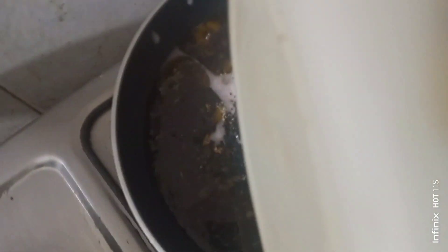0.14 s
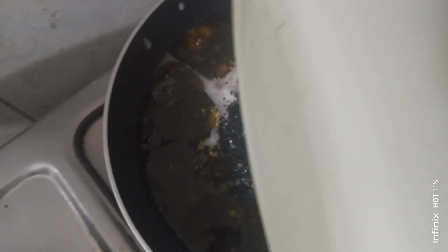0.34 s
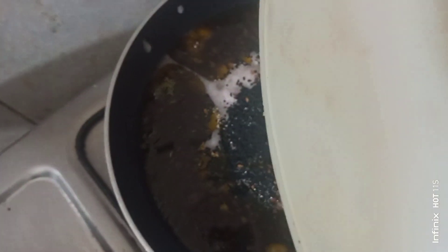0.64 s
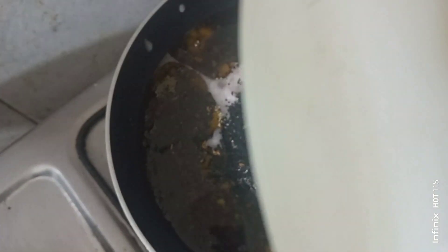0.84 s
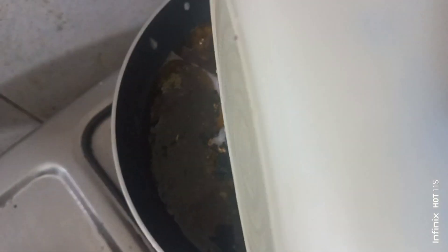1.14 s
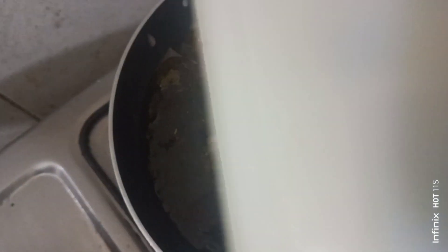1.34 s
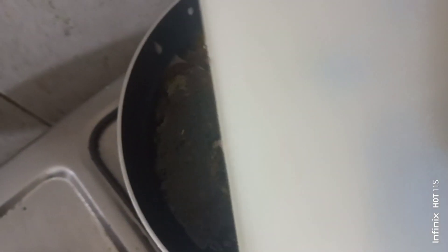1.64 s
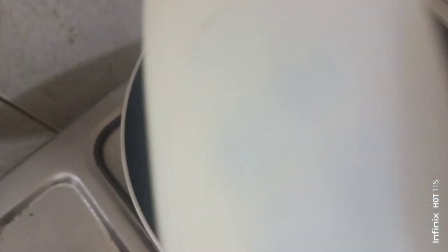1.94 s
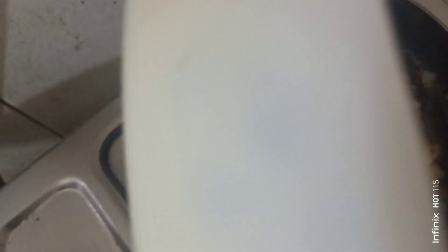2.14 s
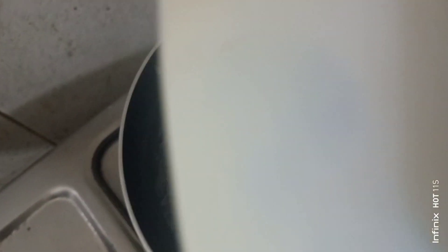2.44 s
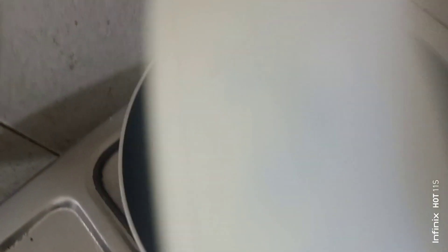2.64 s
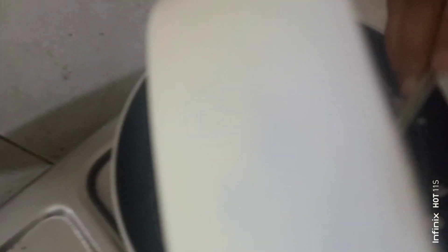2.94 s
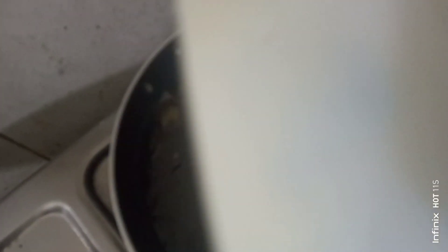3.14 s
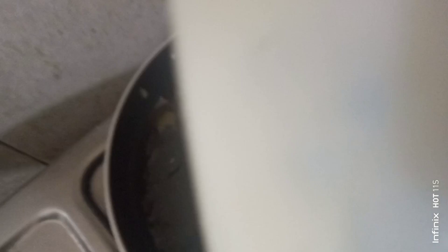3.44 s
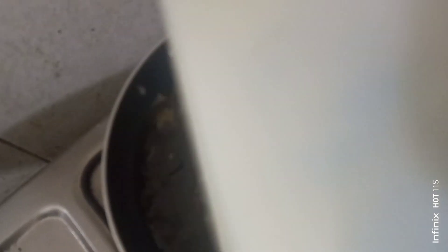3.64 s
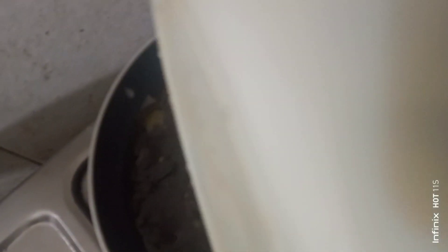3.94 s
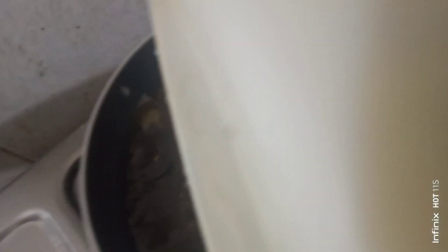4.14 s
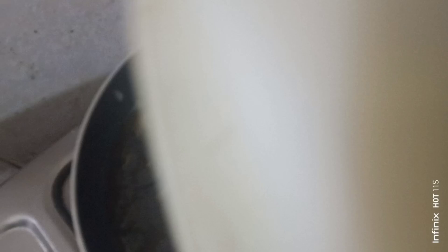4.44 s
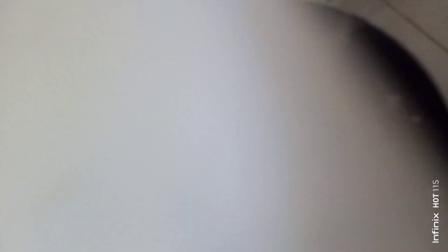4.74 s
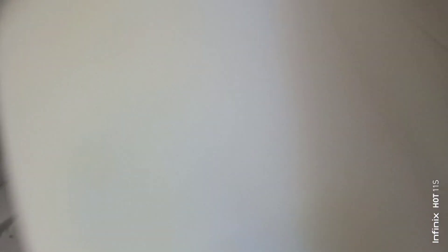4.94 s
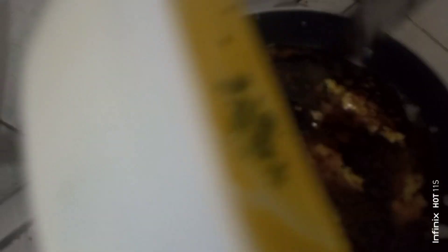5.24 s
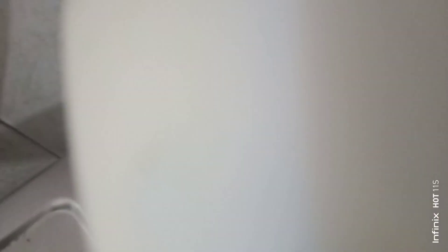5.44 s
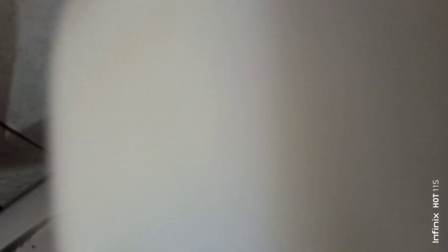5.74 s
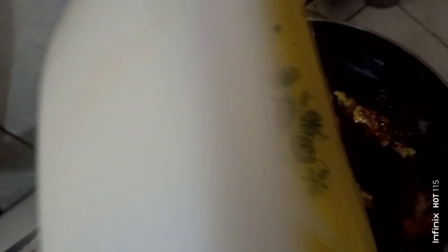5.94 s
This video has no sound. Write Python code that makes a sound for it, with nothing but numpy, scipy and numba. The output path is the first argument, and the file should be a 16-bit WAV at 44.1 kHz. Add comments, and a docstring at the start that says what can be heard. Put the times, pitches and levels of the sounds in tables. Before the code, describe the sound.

A metal spoon clinks and scrapes irregularly in a frying pan of moist food, close up in a small hard-walled kitchen over faint hum.

```python
"""In a small hard-walled kitchen, a metal spoon stirs a moist mixture in a frying pan, close by.
Its clinks and its stick-slip drags excite the same four families of decaying modes, with short noise bursts.
Soft rubs are noise-modulated gliding tones; a thin whistle, frequency-modulated, comes and goes.
Low wavering tones with rumble hum over room noise. A gain control ducks loud sounds and the hum with them."""
import sys
import numpy as np
from scipy import signal
from scipy.fft import rfft, irfft, next_fast_len
from scipy.io import wavfile
from scipy.ndimage import uniform_filter1d, map_coordinates
from numba import njit

SR = 44100
rng = np.random.default_rng(int(sys.argv[2]) if len(sys.argv) > 2 else 0)


def output_pcm(signal):
    """Save a mono or channel-first signal as 16-bit PCM at the path in sys.argv[1].

    Samples are clipped to [-1, 1] before scaling.
    """
    pcm = np.clip(np.atleast_2d(signal).T, -1, 1) * 32767
    wavfile.write(sys.argv[1], SR, np.round(pcm).astype(np.int16))


N = 268524  # samples

FIRM_DB = -3  # strength of a firm blow
SHARPEN = 0.075  # extra dB of crack and tick per dB of strength above a firm blow
CUSHION = 0.1  # dB by which the swell time grows per dB of strength below a firm blow
SWELL_S = 0.0016  # time constant in which the ring of a firm blow swells
CRACK_DB = 1.5  # crack of a blow beside its sharpened strength
TICK_TILT = 0.28  # dB of tick per dB of brightness

# Spoon meets pan: (time [s], strength [dB], brightness [dB], pan body [dB re strength],
# leading mode [Hz], its level [dB re strength], damping t60 [s])
BLOWS = [(0.0094, -27.5, -7.5, -22.5, 2490, 1, 0.034), (0.069, -40, -13, -34, 2407, 10.5, 0.037),
         (0.35, -31.5, -10.5, 4, 2100, 5, 0.15), (0.5041, -18.5, 23, -16, 4490, -6, 0.049),
         (0.6118, -32, 14, -11.5, 2920, -1, 0.09), (0.6255, -25.5, 9.5, -15.5, 3690, 5, 0.054),
         (0.7504, -30.5, 10.5, -22, 2870, -2, 0.064), (0.7645, -25, 4, -9.5, 2484, 5, 0.049),
         (0.7992, -26.5, -6, -19.5, 2412, 10, 0.064), (0.878, -23, -14.5, -14.5, 3936, 1.5, 0.097),
         (1.177, -19.5, 10, -35.5, 2360, 0, 0.078), (1.4068, -10, -1.5, -22.5, 4007, 1, 0.072),
         (1.52, -19.5, -15, -18.5, 2467, 3, 0.041), (1.5516, -16, -4.5, -25.5, 4367, -8, 0.11),
         (1.6133, -26.5, -16.5, -35, 3890, 2, 0.053), (1.9589, -50, 6, 0.5, 3933, 0, 0.18),
         (2.0083, -39.5, 13, -22, 4344, 2.5, 0.079), (2.0626, -31.5, 4.5, -15, 3830, 7, 0.05),
         (2.1119, -30.5, -9, -17.5, 4070, 9, 0.033), (2.1787, -38, 13, -27, 3985, 5, 0.092),
         (2.227, -25, 19.5, -35.5, 3680, 8.5, 0.02), (2.242, -23, 6.5, -19.5, 4040, -2.5, 0.039),
         (2.2633, -29, 6, -16, 2365, -2, 0.1), (2.525, -19, -9, -7.5, 3990, -2.5, 0.07),
         (2.651, -9.5, 1.5, -20.5, 5040, -9, 0.024), (2.7209, -10.5, 7, -22, 3964, -0.5, 0.064),
         (2.7932, -19, -4, -20.5, 2462, 7.5, 0.064), (2.8492, -29, -8.5, -24, 2347, -3, 0.05),
         (2.868, -23.5, -18, -19, 3983, 7, 0.21), (3.2655, -15, 11, -32.5, 4409, 8.5, 0.04),
         (3.4097, -31, 10.5, -44, 6240, 10.5, 0.095), (3.4922, -26.5, -7, -35.5, 3964, 4, 0.114),
         (3.5053, -34, -17.5, -14, 2400, -1, 0.1), (3.741, -22, -1.5, -16, 3980, 12, 0.063),
         (3.791, -14.5, 0, -22, 6375, 7, 0.037), (3.985, -32, -7.5, -21, 2410, 1.5, 0.055),
         (4.0352, -27.5, 20.5, -19, 6400, -12, 0.03), (4.0915, -37, 11, -3.5, 3880, 11, 0.083),
         (4.3074, -15.5, 9.5, -16.5, 4324, -7, 0.076), (4.425, -19.5, 7, -21.5, 2860, -2, 0.057),
         (5.4609, -11, 2, -16, 4301, 6, 0.072), (5.5271, -27, -10, -9, 2970, -17, 0.12),
         (5.5599, -14.5, 0, -9.5, 3958, 8.5, 0.036), (5.5856, -16, -3.5, -14, 4022, 7, 0.083),
         (5.6132, -20, 1.5, -12.5, 2973, -9, 0.036), (5.6869, -23.5, 11, -13.5, 6590, 8.5, 0.057),
         (5.7185, -10, 12.5, -19.5, 6213, 5, 0.089), (6.0501, -15, 7.5, -11.5, 4300, 6, 0.079)]


def clinks(ring_db=9.5, tick_db=-27, wet_db=-7):
    """Impact excitation: each blow starts with a tiny bright tick and rings the modes; harder is sharper."""
    out = np.zeros(N)
    t = np.arange(SR // 100) / SR
    for s, db, bright_db, body_db, lead_hz, lead_db, damped_t60 in BLOWS:
        edge_db = db + SHARPEN * (db - FIRM_DB)
        swell_s = SWELL_S * amp(CUSHION * (FIRM_DB - db))
        lead = amp(db + ring_db + lead_db) * leading_mode(lead_hz, damped_t60, swell_s)
        add(out, s, in_kitchen(lead, wet_db=-15))

        family_db = families(db + ring_db, bright_db, body_db)
        blow = contact(s, family_db, edge_db + CRACK_DB, bright_db, damped_t60,
                       crack_t60=0.038, swell_s=swell_s, size=SR // 3)
        add(out, s, in_kitchen(blow, wet_db))

        tick_gain = amp(edge_db + tick_db + TICK_TILT * bright_db - 60 * t / 0.0082)
        add(out, s, tick_gain * rng.standard_normal(len(t)))
    return out


FREE_DB = -49  # the part of a leading mode that rings on
FREE_T60 = 0.62  # its decay time at 2.4 kHz [s], shorter for higher modes


def leading_mode(hz, damped_t60, swell_s):
    """Contact damping: the favoured mode wavers and is mostly damped by the spoon; a small part sings on."""
    t = np.arange(SR // 2) / SR
    free_t60 = FREE_T60 * np.sqrt(2400 / hz)
    # the random phase walk weakens with the spoon's damping
    steps = rng.standard_normal(len(t)) * np.exp(-t / damped_t60)
    waver = np.cumsum(steps) * .0004 * np.sqrt(hz)
    decay = amp(-60 * t / damped_t60) + amp(FREE_DB - 60 * t / free_t60)
    swell = 1 - np.exp(-t / swell_s)
    return swell * decay * np.sin(2 * np.pi * hz * t + waver)


DRAG_BODY_DB = -27  # pan body of a drag beside its strength

# Spoon drags over the pan: (time [s], length [s], strength [dB], brightness [dB], grit [dB re strength])
DRAGS = [(0.402, 0.071, -35.5, -8, -26), (0.51, 0.088, -32, 25.5, 4), (0.611, 0.18, -41.5, 22, 3),
         (0.82, 0.054, -29, -30, -16), (0.856, 0.077, -19, -13, -20.5), (1.194, 0.066, -28.5, -0.5, -12),
         (1.375, 0.028, -48, 14.5, -6), (1.456, 0.09, -25, 1.5, -3), (1.551, 0.067, -23, -3, -22),
         (2.039, 0.05, -35, 6, 2.5), (2.262, 0.055, -34.5, -4, -10.5), (2.646, 0.032, -31.5, 1.5, -3),
         (2.815, 0.044, -18, -22, -15.5), (2.863, 0.024, -14, -8, -29.5), (2.929, 0.06, -17, -3, -20.5),
         (3.001, 0.024, -33.5, 5, -20), (3.313, .06, -27, 2, -17), (3.395, 0.075, -19.5, -3.5, -21),
         (3.828, 0.069, -27, 1, -2), (3.97, 0.057, -28.5, 0.5, -12.5), (4.07, 0.043, -29, -0.5, -4),
         (4.333, 0.081, -28.5, -10, -18.5), (4.433, 0.042, -7.5, 5.5, -12.5),
         (5.656, 0.035, -19.5, -1, -9.5)]


def scrapes(scratch_db=-4, wet_db=-6):
    """Stick-slip friction: every slip is a tiny blow; each spot crossed has its own colour and caught grains."""
    out = np.zeros(N)
    step, slips_per_step = SR // 80, 7  # samples on one spot, slips on it
    slip_spread_db, bite_spread_db, colour_spread_db = 3.5, 1.5, 5
    for start, length, db, bright_db, grit_db in DRAGS:
        n = max(round(length * SR), step)
        stroke = np.zeros(n + SR // 4)
        pressure = np.pad(signal.windows.tukey(n, .3), (0, step))
        for first in range(0, n, step):
            size, push = rng.standard_normal((2, slips_per_step))
            places = first + rng.integers(0, step, slips_per_step)
            slips = np.sign(push) * amp(slip_spread_db * size)
            bite = amp(bite_spread_db * rng.standard_normal())
            forces = bite * slips / np.linalg.norm(slips) * pressure[places]

            colour_db = bright_db + colour_spread_db * rng.standard_normal()
            family_db = families(db, colour_db, DRAG_BODY_DB)
            answer = contact(start + first / SR, family_db, db + grit_db, colour_db,
                             damped_t60=0.094, crack_t60=0.0067, swell_s=0.0004, size=SR // 5)
            add(answer, 0, amp(db + scratch_db) * (scratch() + scratch()))
            for place, force in zip(places, forces):
                add(stroke, place / SR, force * answer)
        add(out, start, in_kitchen(stroke, wet_db))
    return out


def scratch(centre_hz=2450, spread=.36):
    """Damped oscillation: a hard grain caught under the spoon rings briefly at a pitch of its own."""
    t = np.arange(SR // 40) / SR
    hz = centre_hz * np.exp(spread * rng.standard_normal())
    ring = amp(-60 * t / .013) * np.sin(2 * np.pi * hz * t)
    fade_out = 1 - (t / t[-1]) ** 2
    return ring * (1 - np.exp(-t / .0004)) * fade_out


COUPLING_DB, COUPLING_HZ = 8.5, 132  # boost of a mode at the spoon's main resonance; how near it must be

# Modes of spoon and pan by family: (frequency [Hz], level [dB within the family], free t60 [s])
LOW_FAMILY = [(785, -6, 0.12), (911, 0.5, 0.52), (999, -4.5, 0.33), (1158, 4, 0.038), (1250, -10.5, 0.06)]
MID_FAMILY = [(2130.6, -5, 0.45), (2428, 2.5, 0.35), (2596, 3, 0.043)]
HIGH_FAMILY = [(3760, -9, 0.05), (3983, 4, 0.1), (3968, 0, 0.42), (4310, -1, 0.25), (4370, -3, 0.15),
               (4942, -16, 0.36)]
TOP_FAMILY = [(5708, -20, .3), (5992, -15, .3), (6240, -10, .16), (6300, -6, .35), (6420, -9, .2),
              (6528, -7, .3), (6845, -7, .33), (7040, -11, .15), (7830, -17, .08), (8740, -26, .16)]
# The spoon's main resonance, which joins the middle family: (level [dB within the family], free t60 [s])
SPOON_RESONANCE = (1.5, 0.092)
# That resonance moves as grip and contact point change: (time [s], frequency [Hz])
SPOON_RESONANCE_PITCH = [(.1, 2266), (.36, 2110), (.78, 2420), (.96, 2220), (1.3, 2440), (1.62, 2213),
                         (2.2, 2160), (2.63, 2440), (2.73, 2073), (2.8, 2407), (2.96, 2232), (3.35, 2423),
                         (3.85, 2385), (4.2, 2228), (5.46, 2180)]


def contact(s, family_db, crack_db, bright_db, damped_t60, crack_t60, swell_s, size,
            scatter_db=3.0, free_share=0.36):
    """Modal superposition: a blow's strength is shared between mode families, plus a burst of dense noise."""
    t = np.arange(size) / SR
    ring = np.zeros(size)
    held = amp(-60 * t / damped_t60)
    spoon_hz = np.interp(s, *np.transpose(SPOON_RESONANCE_PITCH))
    middle = list(MID_FAMILY) + [(spoon_hz, *SPOON_RESONANCE)]
    for modes, db in zip((LOW_FAMILY, middle, HIGH_FAMILY, TOP_FAMILY), family_db):
        hz, level, t60 = np.transpose(modes)[:, :, None]
        luck, grip, slide, phase = rng.standard_normal((4, len(modes), 1))
        gain = amp(level + scatter_db * luck + COUPLING_DB * bump(hz, spoon_hz, COUPLING_HZ))

        # the short-lived modes are the spoon's: they shift with grip and bend as it slides;
        # the pan's long ones hardly move
        looseness = np.minimum(.00016 / t60 ** 2 + .001, .16)
        cycles = hz * t * (1 + looseness * (grip + slide * t / (t + damped_t60)))
        free_decay = np.exp(np.float32(-np.log(1000) / t60 * t))
        waves = free_decay * np.sin(np.float32(2 * np.pi * (cycles + phase)))

        # the spoon resting on the metal damps all but a share of each mode, least of all the long ones
        damping = held + np.minimum(free_share * t60 ** 2, .5)
        ring += amp(db) * np.sum(gain * damping * waves, axis=0) / np.linalg.norm(gain)

    crack = np.zeros(size)
    add(crack, 0, grit(bright_db, crack_t60))
    # the food cushions the blow, so the ring takes a moment to swell
    swell = 1 - np.exp(-t / swell_s)
    return swell * ring + np.sqrt(swell) * amp(crack_db) * crack


MID_DB, TOP_DB = -1, -3  # the 2 kHz and 6.5 kHz families beside the 4 kHz one
MID_TILT, TOP_TILT = -0.54, 0.37  # dB that each gains per dB of brightness


def families(strength_db, bright_db, body_db):
    """Spectral balance: brightness moves strength from the 2 kHz mode family to the 6.5 kHz one."""
    mid_db = MID_DB + MID_TILT * bright_db
    top_db = TOP_DB + TOP_TILT * bright_db
    return strength_db + np.array([body_db, mid_db, 0, top_db])


GRIT_TILT = 0.35  # dB per octave above 4 kHz per dB of brightness

# Spectrum of the dense, quickly dying rest of a contact: (frequency [Hz], relative density [dB per Hz])
CRACK_SPECTRUM = [(150, -33.5), (400, -49), (700, -18), (1500, -2), (2800, 12), (4400, 11.5), (5300, 4),
                  (6800, 7), (8200, -4), (9500, -21.5), (12500, -23), (13500, -39), (15200, -17.5),
                  (16500, -32)]


def grit(bright_db, t60):
    """High modal density: the rest of a contact is a short noise burst, with more treble when bright."""
    t = np.arange(SR // 15) / SR

    def response(hz):
        octaves = np.log2(np.clip(hz / 4000, 1, 3))
        return amp(along(CRACK_SPECTRUM, hz) + GRIT_TILT * bright_db * octaves)

    return noise(response, len(t)) * amp(-60 * t / t60)


def shimmer(x, count=36):
    """Convolution with a modal response: the pan's many faint high modes ring along with every contact."""
    low_hz, high_hz, t60, peak_db = 7600, 16000, .2, 7
    t = np.arange(SR // 4) / SR
    rate = np.log(1000) / t60
    modes = np.sin(2 * np.pi * rng.uniform(low_hz, high_hz, (count, 1)) * t).sum(axis=0)
    response = amp(peak_db) * 2 * rate / SR * np.exp(-rate * t) * modes
    return x + signal.fftconvolve(x, response)[:N]


RUB_BLUR_S = 0.011  # a rub's relative width is this time over its length
RUB_AIR_DB = -22.5  # the rough hiss around a rub's note, in its spectrum

# Soft rubbing in the pan:
# (time [s], length [s], centre pitch [Hz], level [dB], fall [share of the pitch, negative rises])
RUBBINGS = [(0.72, 0.23, 581, -48.5, 0.29), (1.18, 0.14, 3724, -39, -0.024),
            (1.478, 0.06, 1188, -41.5, 0.29), (1.702, 0.24, 3559, -67.5, 0.074),
            (1.71, 0.037, 1206, -59, 0.026), (2.043, 0.1, 1498, -50.5, 0.24),
            (2.245, 0.057, 1477, -50, 0.49), (2.526, 0.05, 648, -46.5, 0.3),
            (3.021, 0.14, 353.6, -61, 0.014), (3.293, 0.055, 1122, -47, 0.16),
            (3.84, 0.093, 1420, -55.5, 0.3), (3.973, 0.045, 1334, -36.5, 0.23),
            (5.156, .26, 1223, -64, 0.15), (5.197, 0.27, 3610, -64, -0.0098)]


def rubs():
    """Amplitude modulation by noise: a rub sings in one gliding resonance, purer the longer it lasts."""
    out = np.zeros(N)
    for s, length, centre_hz, db, fall in RUBBINGS:
        n = round(length * SR)
        glide = centre_hz * (1 + fall * np.linspace(.5, -.5, n))
        width = centre_hz * RUB_BLUR_S / length
        carrier = np.sin(2 * np.pi * np.cumsum(glide) / SR)

        def response(hz):
            return bump(hz, 0, width) ** 2 + amp(RUB_AIR_DB) * bump(hz, 0, centre_hz / 4)

        rub = unit(carrier * noise(response, n)) * signal.windows.tukey(n, .5)
        add(out, s, in_kitchen(amp(db) * rub, wet_db=-2.0))
    return out


# When the whistle sounds: (time [s], length [s], level [dB])
WHISTLE_TIMES = [(3.469, 0.42, -52.5), (4.224, 0.13, -56.5), (4.667, 0.3, -50.5), (4.86, 0.51, -69.5)]
# Its pitch holds, then creeps up: (time [s], frequency [Hz])
WHISTLE_GLIDE = [(3.7, 4361), (4.26, 4494), (4.69, 4557), (4.86, 4670), (5.25, 4796)]


def whistle(waver_hz=22, gain_db=0.0):
    """Frequency modulation: a thin tone with a faint octave wavers, comes and goes and creeps up in pitch."""
    hz = np.interp(np.arange(N) / SR, *np.transpose(WHISTLE_GLIDE))
    phase = 2 * np.pi * np.cumsum(hz + waver_hz * wobble(160)) / SR
    tone = unit(np.sin(phase) + amp(-43.5) * np.sin(2 * phase))
    level = np.zeros(N)
    for s, length, db in WHISTLE_TIMES:
        add(level, s, amp(db) * signal.windows.tukey(round(length * SR), .5))
    flutter_db, wet_db = 2.5, -4
    flutter = amp(gain_db + flutter_db * wobble(32))
    return in_kitchen(tone * level * flutter, wet_db)[:N]


# Tones of the hum: (frequency [Hz], wavering [Hz])
HUM_PITCHES = [(95, 3.5), (155, 4), (180, 5)]
# Base level of each of these, tone and rumble together weighted below: (low [dB], middle [dB], high [dB])
HUM_LEVELS = [-56.5, -59.5, -66]
# Level changes of the hum: it swells, or is turned down under loud clinks:
# (time of extreme [s], width [s], low change [dB], middle change [dB], high change [dB])
HUM_CHANGES = [(.2, 0.21, 15.5, -1.5, 1.5), (2.8, 0.18, -20.5, -3, -1), (3.6, 0.21, 13.5, 24.5, 11.5),
               (4.699, 0.38, -1.5, 8.5, 12), (5.6, 0.32, 12, -8, -4.5)]
# Room noise: (frequency [Hz], relative density [dB per Hz])
AIR_SPECTRUM = [(25, -46), (120, -11.5), (439, -17.5), (2410, -26.5), (4490, -29.5), (9840, -44.5),
                (16000, -56)]


def hum(tone_db=-4, rumble_db=-7, rumble_width_hz=27, air_db=-68):
    """Narrow-band noise around wavering tones: three low tones change in level over steady room noise."""
    out = noise(lambda hz: amp(along(AIR_SPECTRUM, hz)), N) * amp(air_db)
    t = np.arange(N) / SR
    changes_db = np.zeros((len(HUM_PITCHES), N))
    for s, width, *extreme_db in HUM_CHANGES:
        changes_db += np.outer(extreme_db, np.exp(-((t - s) / width) ** 2))
    for (centre, waver_hz), db, change_db in zip(HUM_PITCHES, HUM_LEVELS, changes_db):
        tone = unit(np.sin(2 * np.pi * np.cumsum(centre + waver_hz * wobble(25)) / SR))
        rumble = noise(lambda hz: bump(hz, centre, rumble_width_hz) ** 2, N)
        level = amp(db + change_db + 2.1 * wobble(12))
        out += level * (amp(tone_db) * tone + amp(rumble_db) * rumble)
    return out


# Reverberation time of the kitchen: (frequency [Hz], t60 [s])
KITCHEN_T60 = [(200, 0.65), (600, 0.27), (3500, 0.3), (9200, 0.19), (15000, 0.27)]


def in_kitchen(x, wet_db, build_s=0.0017):
    """Reverberation: a noise tail builds up as the walls answer and decays at a rate set by frequency."""
    hz, t, z = signal.stft(rng.standard_normal(SR // 2), SR, nperseg=256)
    decay = amp(-60 * t / along(KITCHEN_T60, hz)[:, None])
    shape = decay * (1 - np.exp(-t / build_s))
    tail = signal.istft(z * shape, SR, nperseg=256)[1]
    echo = amp(wet_db) * tail / np.linalg.norm(tail)
    echo[0] += 1  # the direct sound
    return signal.fftconvolve(x, echo)


def amp(db):
    """Logarithmic level: decibels to gain."""
    return 10 ** (np.asarray(db) / 20)


def unit(x):
    """Normalisation: x at rms 1."""
    return x / np.sqrt(np.mean(x ** 2) + 1e-20)


def along(points, hz):
    """Logarithmic interpolation: (frequency [Hz], value) points read on a log axis."""
    f, v = np.transpose(points)
    return np.interp(np.log(hz + 1), np.log(f + 1), v)


def wobble(rate):
    """Band-limited fluctuation: a smooth random curve with rate knots a second."""
    knots = rng.standard_normal(int(N * rate / SR) + 4)
    return map_coordinates(knots, [np.arange(N) * rate / SR])


def filtered(x, response):
    """Linear filtering: the spectrum of x times a response of frequency."""
    m = next_fast_len(len(x) + SR // 10)
    return irfft(rfft(x, m) * response(np.fft.rfftfreq(m, 1 / SR)), m)[:len(x)]


def noise(response, size):
    """Spectral shaping: coloured noise of rms 1."""
    return unit(filtered(rng.standard_normal(size), response))


def bump(hz, centre, width):
    """Resonance: a bell-shaped curve of height 1."""
    return 1 / (1 + ((hz - centre) / width) ** 2)


def add(track, s, x):
    """Superposition: mix x into the track from time s."""
    part = track[max(round(s * SR), 0):][:len(x)]
    part += x[:len(part)]


@njit
def follow(x, rise, fall):
    """Envelope following: a level tracker with separate rising and falling speeds."""
    out, level = np.zeros(len(x)), 0.
    for i in range(len(x)):
        level += (x[i] - level) * (rise if x[i] > level else fall)
        out[i] = level
    return out


SPOON_DB = 1  # gain of the spoon's work over the hum and the whistle


def scene():
    """Superposition: all sources add up at one microphone."""
    contacts = shimmer(clinks() + scrapes())
    spoon = amp(SPOON_DB) * (contacts + rubs())
    return (spoon + whistle() + hum())[None]


TOP_HZ = 16600  # upper end of the band


def record(dry, threshold_db=-28, slope=0.47, attack_s=0.0012, release_s=0.028,
           slow_slope=0.09, slow_release_s=0.12):
    """Compression: loud attacks duck everything, with a fast and a slow recovery; a steep low-pass follows."""
    x = dry[0]
    power = np.abs(uniform_filter1d(x * x, size=88))
    over_db = np.maximum(10 * np.log10(power + 1e-12) - threshold_db, 0)
    # the gain takes a moment to fall, which lets the start of an attack through
    duck_db = follow(slope * over_db, 1 / (attack_s * SR), 1 / (release_s * SR))
    duck_db += follow(slow_slope * over_db, 1 / (release_s * SR), 1 / (slow_release_s * SR))
    return filtered(x * amp(-duck_db), lambda hz: hz < TOP_HZ)[None]


dry = scene()
out = record(dry)
output_pcm(out)
```